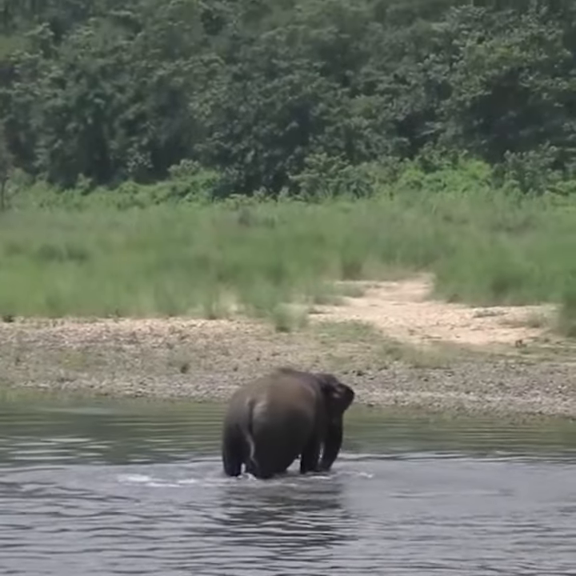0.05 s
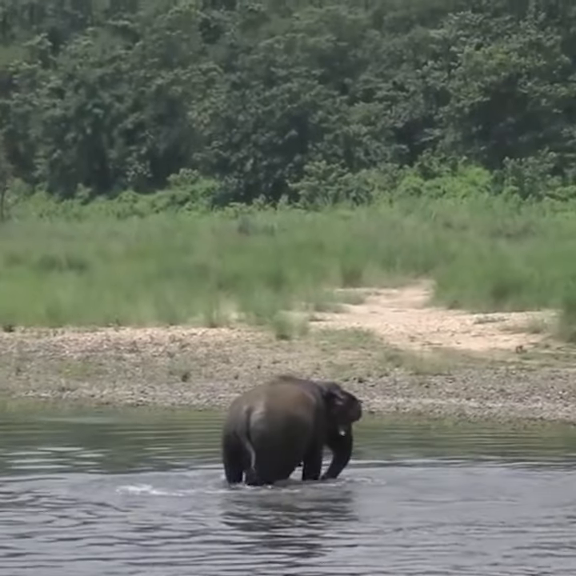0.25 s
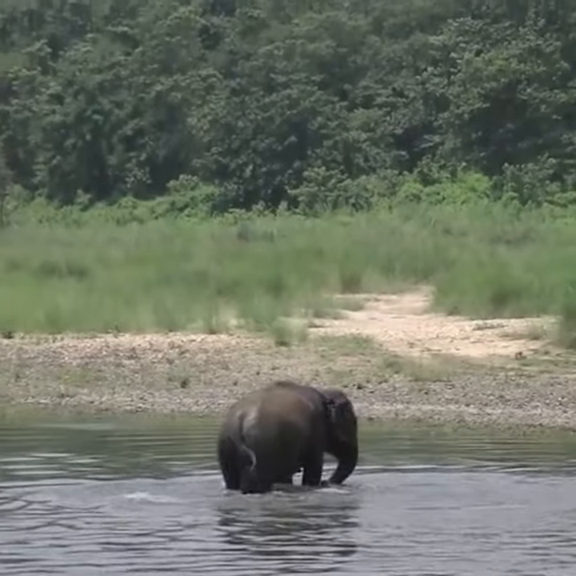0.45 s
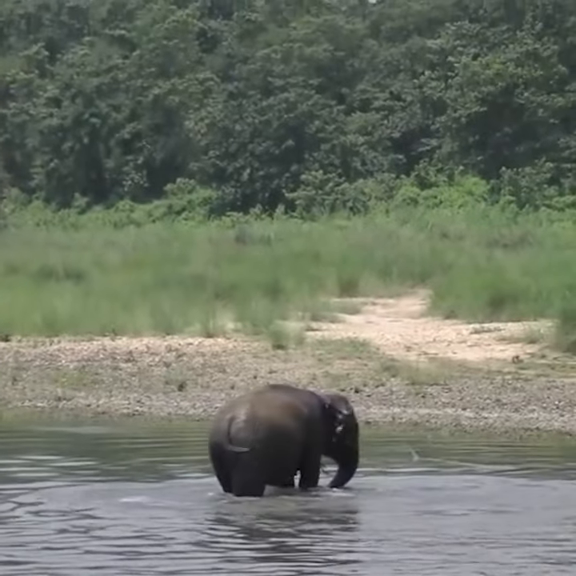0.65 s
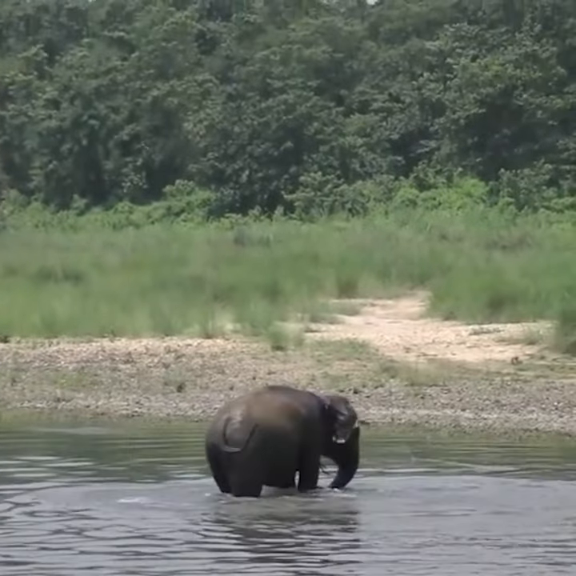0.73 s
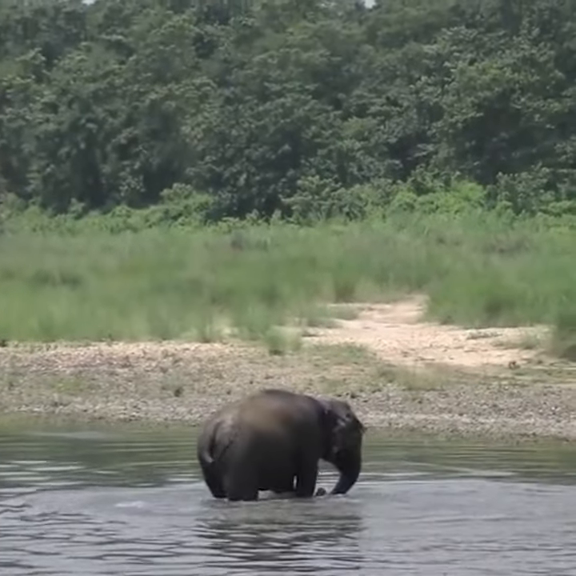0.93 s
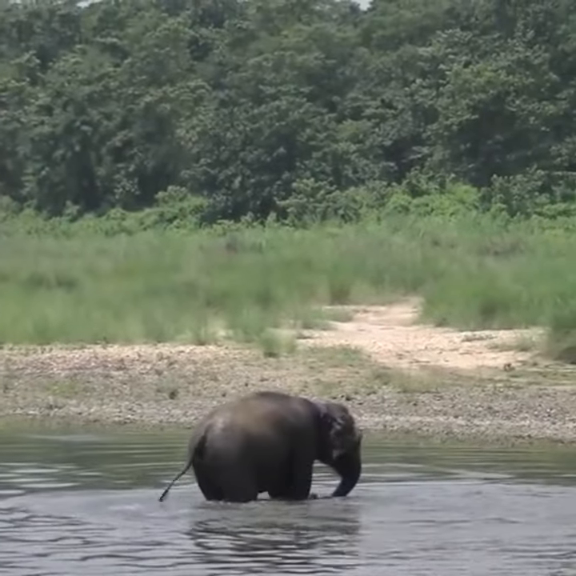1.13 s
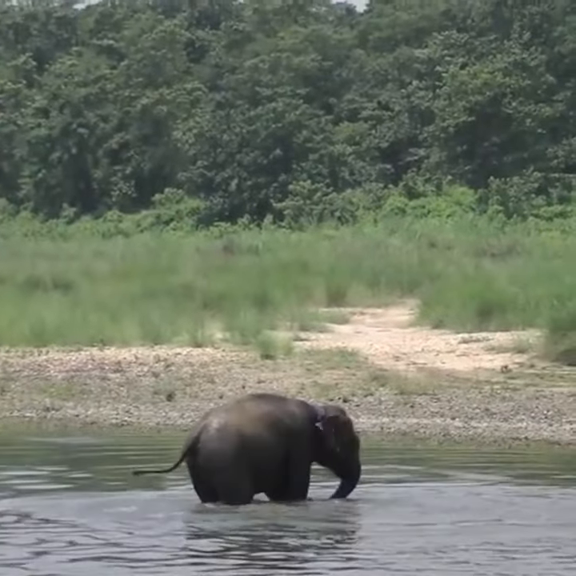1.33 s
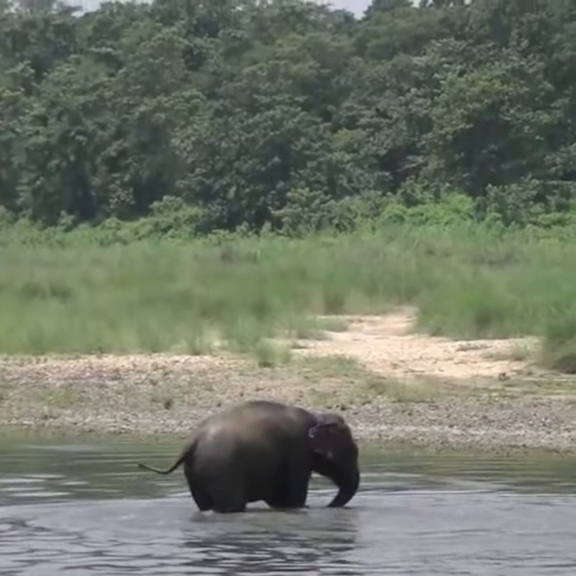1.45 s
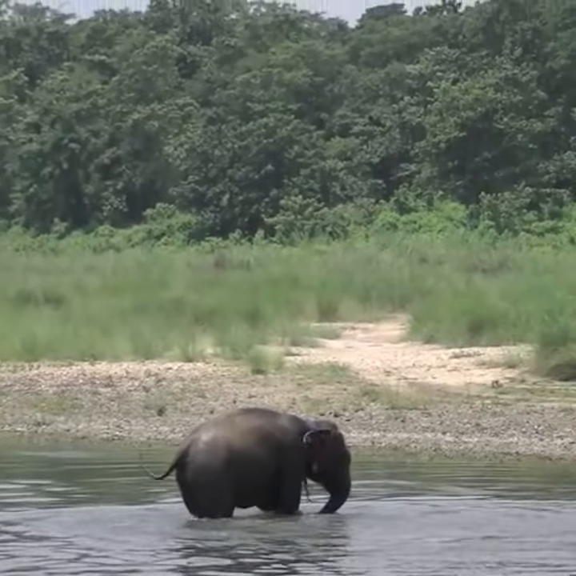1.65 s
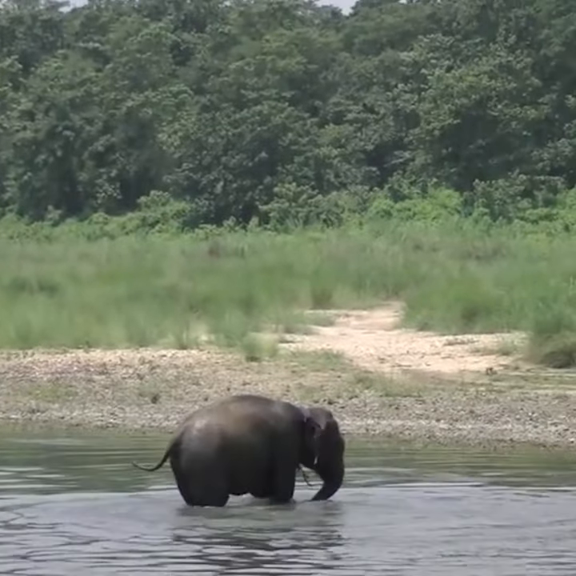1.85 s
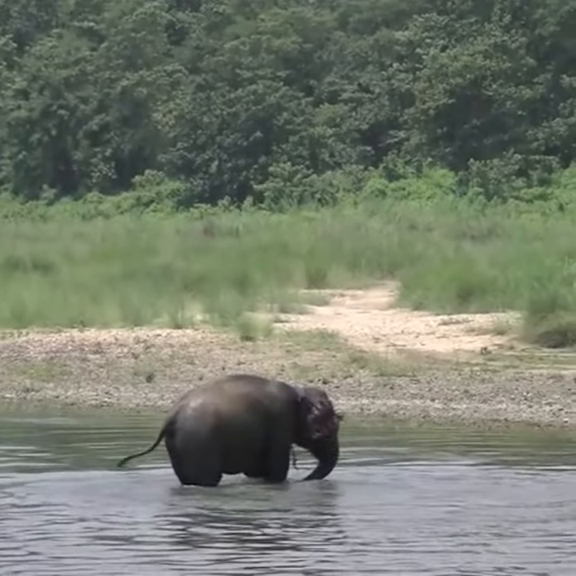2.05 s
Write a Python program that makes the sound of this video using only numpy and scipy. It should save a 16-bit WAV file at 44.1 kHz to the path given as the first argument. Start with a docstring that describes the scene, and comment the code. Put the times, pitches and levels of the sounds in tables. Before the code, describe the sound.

An elephant gives three high, slightly raspy squeals, each dipping in pitch and rising again, the last one short and fluttering. The cries echo outdoors over a faint, steady wash of river water with a few light splashes.

```python
"""Elephant squealing in a river

A wading elephant gives three high cries, each dipping in pitch and rising again: nearly pure tones
with thin overtones shaped by trunk and mouth. They rasp at the edges; two carry a faint hiss and
end in a small squeak, and the last flutters. The banks and the forest throw them back over a
steady wash of water, with a few light splashes."""
import sys
import numpy as np
from scipy import signal
from scipy.fft import rfft, irfft
from scipy.io import wavfile

SR = 44100
rng = np.random.default_rng(int(sys.argv[2]) if len(sys.argv) > 2 else 0)


def master_out(mix):
    """Clip the mix to full scale and print it as 16-bit PCM to the path in sys.argv[1]."""
    frames = np.transpose(np.atleast_2d(mix))
    ceiling = np.clip(frames, -1, 1)
    pcm = np.round(ceiling * 32767).astype(np.int16)
    wavfile.write(sys.argv[1], SR, pcm)


N = 92610
TIME_S = np.arange(N) / SR
BINS_HZ = np.fft.rfftfreq(N, 1 / SR)


def amp(db):
    """Decibels to gain."""
    return 10 ** (np.asarray(db) / 20)


def unit(x):
    """Scales to rms 1."""
    return x / np.sqrt(np.mean(abs(x) ** 2) + 1e-20)


def lookup(table, hz):
    """Interpolates a table over log frequency."""
    f, value = np.transpose(table)
    return np.interp(np.log(np.maximum(hz, 1)), np.log(f), value)


def add(mix, start_s, sound):
    """Mixes in a stereo sound."""
    part = mix[:, max(round(start_s * SR), 0):][:, :sound.shape[1]]
    part += sound[:, :part.shape[1]]


def colour(x, spectrum):
    """Filters x by a spectrum table; rms 1."""
    return unit(irfft(rfft(x) * amp(lookup(spectrum, BINS_HZ)), N))


def wander(cutoff_hz):
    """Low-passed noise; rms 1."""
    return unit(irfft(rfft(rng.standard_normal(N)) / (1 + (BINS_HZ / cutoff_hz) ** 4), N))


def arch(t, start_s, length_s):
    """Root-sine window."""
    return np.sqrt(abs(np.sin(np.pi * np.clip((t - start_s) / length_s, 0, 1))))


# Water spectrum: f/Hz, relative density/dB
RIVER_SPECTRUM = [(25, -65), (70, -46), (120, -30), (170, -25), (260, -15.5), (420, -13.5), (600, -12.5),
                  (900, -7), (1400, -13.5), (2000, -13.5), (2700, -20.5), (3500, -23.5), (4600, -30),
                  (6500, -30.5), (9000, -35.5), (12500, -36), (14700, -47)]

def river(wash_db=-46, swell_db=2, common_gain=0.062, laps_db=-58.5, laps_per_s=71, lap_decay_s=0.0041):
    """A wide, steady wash with tiny laps of water in it."""
    noise = rng.standard_normal((2, N)) + common_gain * rng.standard_normal(N)
    wash = colour(noise, RIVER_SPECTRUM) * amp(wash_db + swell_db * wander(cutoff_hz=24))
    hits = (rng.random(N) < laps_per_s / SR) * rng.exponential(1, N)
    envelope = signal.lfilter([1], [1, -np.exp(-1 / (lap_decay_s * SR))], hits)
    laps = colour(envelope * rng.standard_normal((2, N)), RIVER_SPECTRUM)
    return wash + amp(laps_db) * laps


# Trunk and mouth resonances: f/Hz, relative gain/dB
TRACT_RESPONSE = [(2300, 6.5), (2480, 7), (2680, 11), (2900, -32), (3120, -8.5), (3330, 7.5), (3600, -2),
                  (3850, -0.5), (4100, -0.5), (4500, -5), (5100, -8), (5600, -32), (7200, -29.5),
                  (7900, -28), (9000, -30), (11000, -35), (14000, -43)]

def vocal_tract(harmonic, hz, tilt_db_per_octave=-7.5):
    """Trunk and mouth weight the upper overtones; total power 1."""
    gains = amp(lookup(TRACT_RESPONSE, harmonic * hz) + tilt_db_per_octave * np.log2(harmonic))
    return gains / np.linalg.norm(gains, axis=0)


# Stereo balance: f/Hz, left minus right/dB
STEREO_BALANCE = [(780, 1.5), (830, 4), (900, 3.5), (950, 8.5), (1000, -6), (1060, -1.5), (1125, -14),
                  (1200, -1), (1400, -3.5), (1600, -7), (1850, -3), (2220, 1.5), (2400, -6.5), (2700, -2),
                  (3300, 1), (3700, -5), (4100, -10.5), (4500, -10), (5100, 2.5)]
# Stereo phase: f/Hz, left lead/rad
STEREO_LEAD = [(800, 0.19), (900, -0.54), (1100, -1.16), (1600, -.3), (2300, -.3), (2700, -1.7),
               (3170, -1.1), (3370, 0.25), (3600, -.4), (4100, 0.65), (4500, 2), (5100, 1.3), (9000, 0)]

def stereo_partials(phases, hz):
    """Left and right sinusoids, their balance and phase offset set by frequency."""
    balance = amp(lookup(STEREO_BALANCE, hz))
    left = balance * np.cos(phases + lookup(STEREO_LEAD, hz))
    return np.array([left, np.cos(phases)]) * 2 / np.sqrt(1 + balance ** 2)


# Breath spectrum: f/Hz, relative density/dB
BREATH_SPECTRUM = [(100, -47), (300, -33.5), (700, -11), (1000, 0.5), (1550, 8), (2300, -1), (2900, -7.5),
                   (3400, 7), (3850, -8), (4600, -9), (5200, -5.5), (5900, -25.5), (7800, -24.5),
                   (8900, -18.5), (10500, -23), (14000, -33.5)]

def breath(common_gain=0.9):
    """Air rushing with the voice, partly common to both sides."""
    return colour(rng.standard_normal((2, N)) + common_gain * rng.standard_normal(N), BREATH_SPECTRUM)


# Voice texture: t/s, roughness/0-1, breath level/dB
RASP = [(.15, 0.51, -51), (.175, 0.44, -37), (.22, 0.59, -43), (.255, 0.13, -40.5), (.33, 0, -51.5),
        (.42, 0.14, -41), (.47, 0.1, -42.5), (.53, 0.46, -42.5), (.59, 0.05, -45.5), (.72, 0.14, -48),
        (.77, 0.13, -48), (.885, .1, -51.5), (.92, 0.12, -43), (1.0, 0, -46.5), (1.13, 0.16, -45),
        (1.25, 0.03, -46.5), (1.31, 0.24, -61), (1.71, 0.06, -52.5), (1.76, 0, -47.5), (1.82, 0.27, -43.5),
        (1.854, 0.22, -45), (1.9, 0.24, -64)]
# Voice flutters: t/s, length/s, rate/Hz, depth/0-1
FLUTTER_BURSTS = [(.178, 0.026, 164.7, 0.2), (1.769, .07, 72.8, 0.64)]
JITTER, SHIMMER, SMEAR_RAD = 0.045, 0.35, 0.38  # rms at roughness 1
JITTER_HZ, SHIMMER_HZ, SMEAR_HZ = 158, 231, 219
FLICKER_DB, FLICKER_HZ = 3, 37.8

def voice(contour, harmonics=12, edge_s=0.003, swing_hz_per_depth=70):
    """A tone with overtones and breath, jittered and blurred by roughness; returns start/s, sound."""
    times, *controls = np.transpose(contour)
    active = np.flatnonzero((TIME_S >= times[0]) & (TIME_S <= times[-1]))
    t = TIME_S[active]
    hz, fundamental_db, octave_db, upper_db = (np.interp(t, times, c) for c in controls)
    rasp_times, *textures = np.transpose(RASP)
    roughness, breath_db = (np.interp(t, rasp_times, c) for c in textures)
    k = np.arange(1, harmonics + 1)[:, None]

    def overtone_wander(cutoff_hz):
        """Separate noise per overtone, none on the fundamental."""
        return wander(cutoff_hz)[(active + k * (N // harmonics)) % N] * (k > 1)

    envelope = np.clip(np.minimum(t - times[0], times[-1] - t) / edge_s, 0, 1)
    for start_s, length_s, rate_hz, depth in FLUTTER_BURSTS:
        beat = depth * arch(t, start_s, length_s) * np.exp(2j * np.pi * rate_hz * (t - start_s))
        envelope *= 1 + beat.real
        hz -= swing_hz_per_depth * beat.imag  # pitch falls through each beat
    envelope *= 1 + SHIMMER * roughness * wander(SHIMMER_HZ)[active]
    jittered_hz = hz * (1 + JITTER * roughness * wander(JITTER_HZ)[active])
    phase = 2 * np.pi * np.cumsum(jittered_hz) / SR
    phases = k * (phase + SMEAR_RAD * roughness * overtone_wander(SMEAR_HZ))
    gains = np.vstack([amp(fundamental_db), amp(octave_db), amp(upper_db) * vocal_tract(k[2:], hz)])
    flicker = amp([FLICKER_DB * overtone_wander(FLICKER_HZ) for side in range(2)])
    tone = (gains * flicker * stereo_partials(phases, k * hz)).sum(axis=1)
    return times[0], envelope * (tone + amp(breath_db) * breath()[:, active])


# Cry contours: t/s, f/Hz, fundamental/dB, octave/dB, upper overtones/dB
LONG_CRY = [(0.152, 2427, -55.5, -62, -71), (0.168, 1903, -33.5, -39.5, -61), (0.19, 1543, -34, -50, -46),
            (0.228, 1188, -20, -57.5, -44.5), (0.25, 1109, -20, -31, -32), (0.272, 1089, -16.5, -32.5, -31),
            (0.305, 1128, -20.5, -34, -27.5), (0.335, 1128, -20.5, -45.5, -23.5),
            (0.39, 1099, -15.5, -40, -34), (0.435, 1051, -14, -34, -45), (0.45, 956.6, -18.5, -42, -55),
            (0.467, 898.6, -7.5, -35.5, -41), (0.488, 872.3, -10.5, -46.5, -37.5),
            (0.507, 894.8, -11, -42, -44.5), (0.52, 945, -27, -49, -59.5), (0.542, 977, -25, -44, -63),
            (0.563, 910, -11.5, -35, -46.5), (0.597, 880.6, -10, -38, -30.5), (0.635, 916.8, -13, -29, -39),
            (0.668, 942, -16.5, -25.5, -44), (0.681, 984, -33.5, -33.5, -38.5),
            (0.702, 1059, -21.5, -31.5, -34), (0.733, 1139, -26.5, -47, -33)]
SWOOPING_CRY = [(0.884, 1481, -43.5, -64, -59.5), (0.897, 1278, -30.5, -63, -52.5),
                (0.917, 1110, -25, -51.5, -31), (0.937, 946, -25.5, -52, -45.5),
                (0.948, 915, -15, -40, -45), (0.965, 866.5, -12, -38, -43),
                (0.978, 860, -27.5, -36.5, -32.5), (0.99, 814, -17.5, -27.5, -35.5),
                (1.01, 768, -14, -31.5, -39.5), (1.036, 790, -20.5, -35, -38.5),
                (1.061, 794, -13, -23.5, -38.5), (1.084, 842, -22, -31, -39), (1.123, 911, -6, -33, -36.5),
                (1.148, 978.5, -26, -26.5, -36), (1.176, 1059, -14.5, -38.5, -34.5),
                (1.193, 1125, -29, -30.5, -33), (1.237, 1202, -31.5, -34, -43),
                (1.278, 1246, -46.5, -36, -51)]
SHORT_CRY = [(1.707, 998, -39, -51, -70), (1.729, 854.4, -14.5, -62, -56.5),
             (1.753, 768, -11.5, -41.5, -62.5), (1.769, 813.8, -14.5, -45, -59.5),
             (1.81, 876, -16, -42, -60.5), (1.832, 952, -26.5, -38, -46.5),
             (1.855, 1164, -33.5, -43, -31.5), (1.876, 1167, -35, -40, -53), (1.902, 1342, -34.5, -65, -81)]

def cries():
    """Three squeals, each dipping in pitch and rising again."""
    out = np.zeros((2, N))
    for contour in (LONG_CRY, SWOOPING_CRY, SHORT_CRY):
        add(out, *voice(contour))
    return out


# Forest reverberation: f/Hz, T60/s
FOREST_DECAY = [(300, 1.2), (900, 1.555), (2000, 1.3), (4000, 0.23), (10000, 0.22)]

def echoes(near, bank_db=-15, bank_t60_s=0.34, forest_db=-25.5, forest_rise_s=0.02, drift_hz=7.6):
    """Quick scatter from the bank and a long tail from the forest, whose paths keep shifting."""
    mono = near.mean(axis=0, keepdims=True)

    def reflect(response):
        """Convolves with the response at unit energy."""
        return signal.fftconvolve(mono, unit(response) / np.sqrt(N), axes=1)[:, :N]

    out = amp(bank_db) * reflect(rng.standard_normal((2, N)) * amp(-60 * TIME_S / bank_t60_s))
    rise = np.minimum(TIME_S / forest_rise_s, 1)
    shares = np.array([wander(drift_hz) for path in range(3)])
    for share in shares / np.linalg.norm(shares, axis=0):
        hz, frame_s, noise = signal.stft(rng.standard_normal((2, N)), SR, nperseg=256)
        decay = amp(-60 * frame_s / lookup(FOREST_DECAY, hz)[:, None])
        tail = signal.istft(noise * decay, SR, nperseg=256)[1][:, :N]
        out += amp(forest_db) * share * reflect(tail * rise)
    return out


# Hiss on the cries: t/s, length/s, level/dB
HISS_BURSTS = [(0.164, .09, -71), (0.905, .37, -62)]
# Hiss spectrum: f/Hz, relative density/dB
HISS_SPECTRUM = [(5000, -37), (7500, -16), (8500, -5), (9200, 3), (10300, -5.5), (11000, -14.5),
                 (14000, -27.5)]

def hiss():
    """Air forced through a narrow opening hisses high above the cry."""
    envelope = sum(amp(db) * arch(TIME_S, start_s, length_s) for start_s, length_s, db in HISS_BURSTS)
    return envelope * colour(rng.standard_normal((2, N)), HISS_SPECTRUM)


# Squeaks: t/s, length/s, first f/Hz, last f/Hz, level/dB
SQUEAK_GLIDES = [(0.187, .055, 1551, 1490, -30.5), (0.735, 0.029, 1437, 1489, -30.5),
                 (1.281, 0.032, 1377, 1488, -30.5)]

def squeaks(lead_in_s=0.0032, fade_db=-4, octave_db=-24.5, upper_db=-18):
    """Brief, higher glides of the voice during or just after a cry."""
    out = np.zeros((2, N))
    for start_s, length_s, first_hz, last_hz, db in SQUEAK_GLIDES:
        levels_db = db + np.array([0, octave_db, upper_db])
        first = (start_s - lead_in_s, first_hz, *levels_db)
        last = (start_s + length_s, last_hz, *(levels_db + fade_db))
        add(out, *voice([first, last]))
    return out


# Water slaps: t/s, level/dB, decay/s
SPLASH_HITS = [(.793, -49, 0.007), (1.09, -25, 0.0054), (1.104, -19.5, 0.0027), (1.169, -32.5, 0.0083),
               (1.259, -33.5, 0.011), (2.092, -30, 0.0063)]
# Splash spectrum: f/Hz, relative density/dB
SPLASH_SPECTRUM = [(20, -60), (140, -33.5), (380, 3), (900, 7), (1500, 1), (2500, -14.5), (4500, -33.5),
                   (12000, -44)]

def splashes():
    """Short slaps of water: noise bursts with a sharp onset and exponential decay."""
    envelope = sum(amp(db) * (TIME_S >= start_s) * np.exp(-abs(TIME_S - start_s) / decay_s)
                   for start_s, db, decay_s in SPLASH_HITS)
    rms = np.sqrt(np.mean(envelope ** 2))
    return rms * colour(envelope * rng.standard_normal((2, N)), SPLASH_SPECTRUM)


def scene():
    """The elephant and its splashes, their echoes and the river."""
    near = cries() + squeaks() + hiss() + splashes()
    return near + echoes(near) + river()


def record(dry, cutoff_hz=14500):
    """Linear-phase low-pass."""
    lowpass = signal.firwin(255, cutoff_hz, window=("kaiser", 9), fs=SR)
    return signal.oaconvolve(dry, lowpass[None], "same")


dry = scene()
out = record(dry)
master_out(out)
```